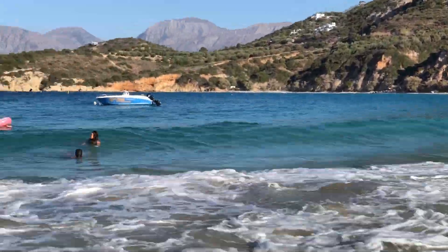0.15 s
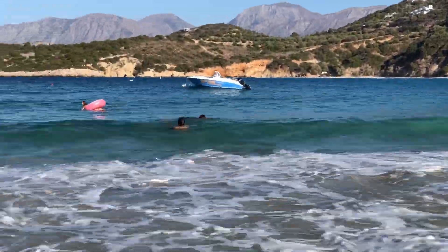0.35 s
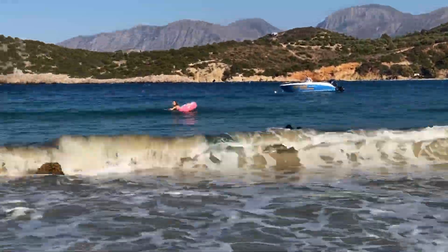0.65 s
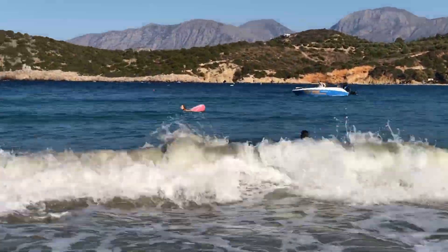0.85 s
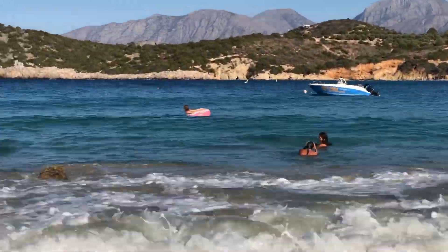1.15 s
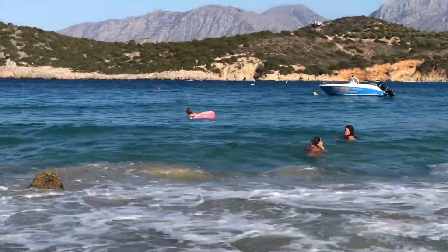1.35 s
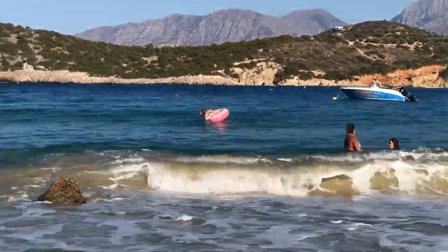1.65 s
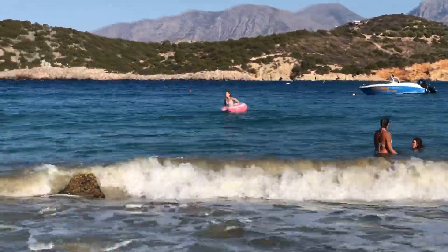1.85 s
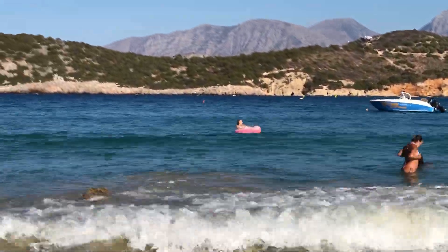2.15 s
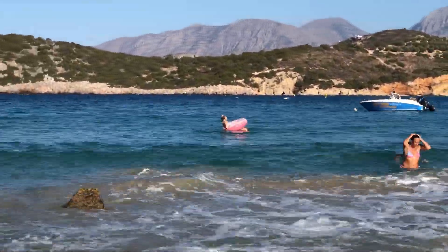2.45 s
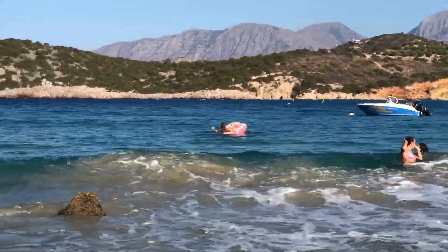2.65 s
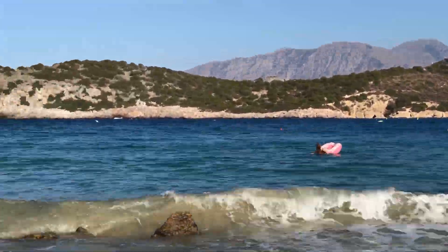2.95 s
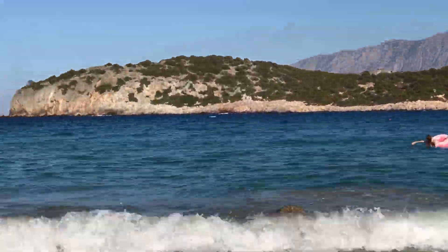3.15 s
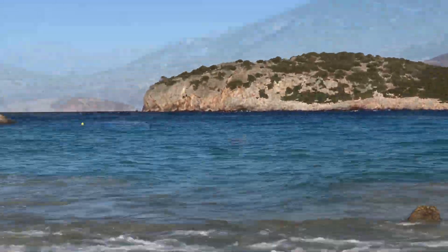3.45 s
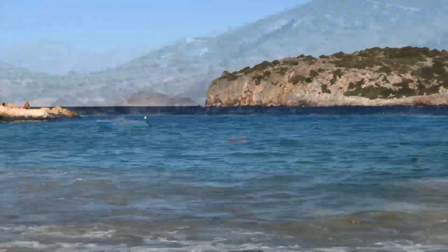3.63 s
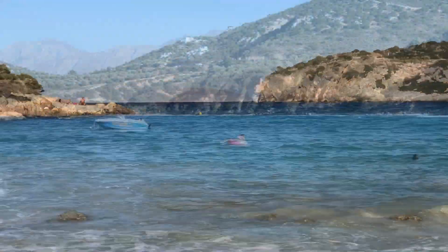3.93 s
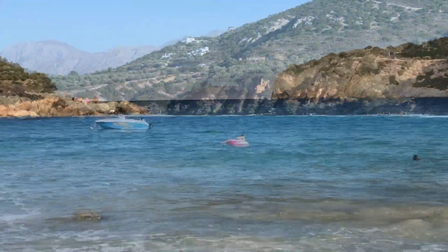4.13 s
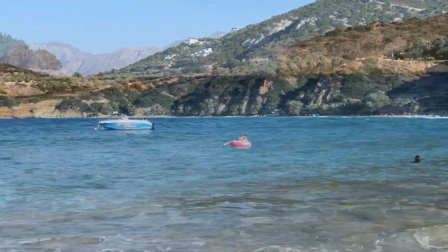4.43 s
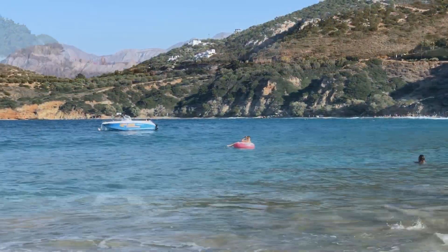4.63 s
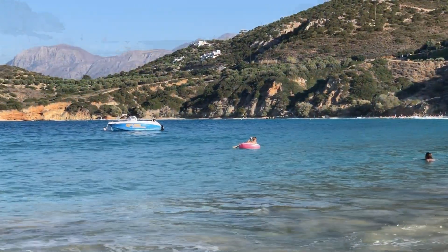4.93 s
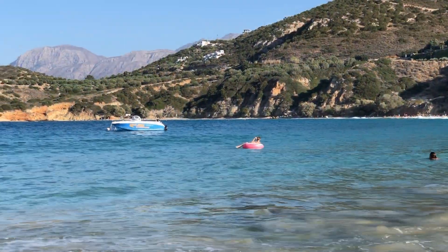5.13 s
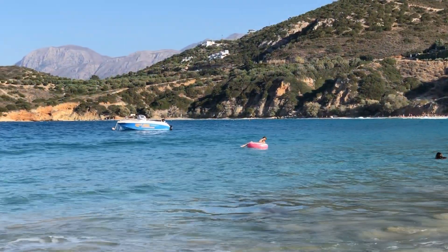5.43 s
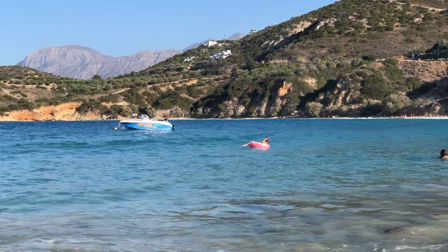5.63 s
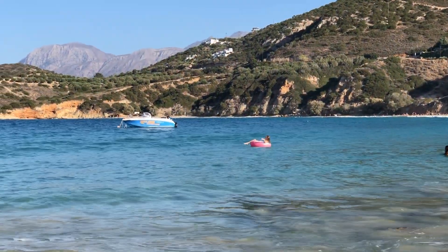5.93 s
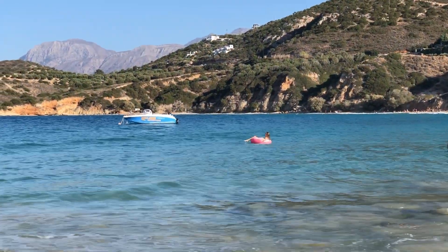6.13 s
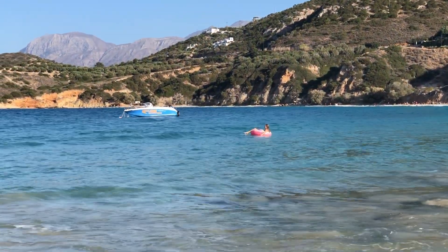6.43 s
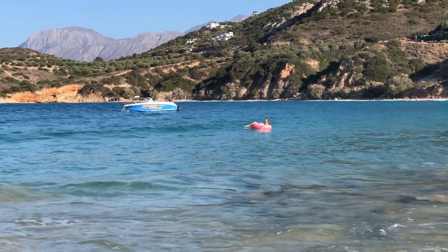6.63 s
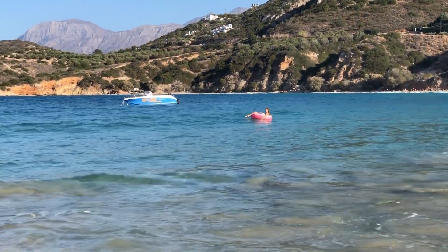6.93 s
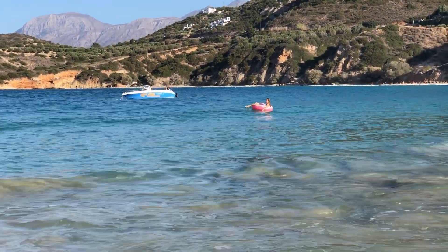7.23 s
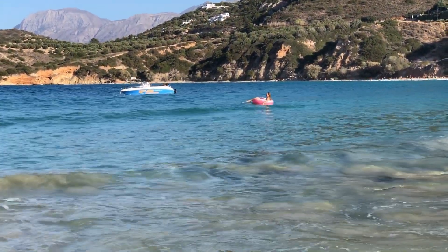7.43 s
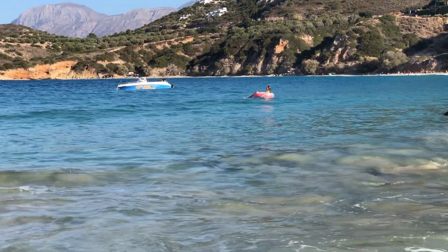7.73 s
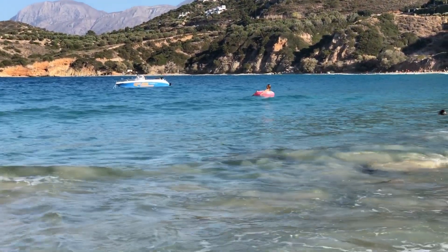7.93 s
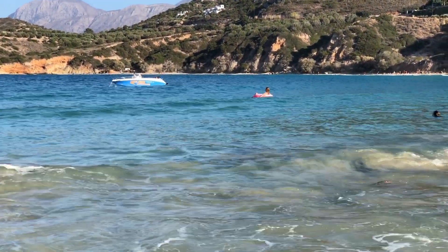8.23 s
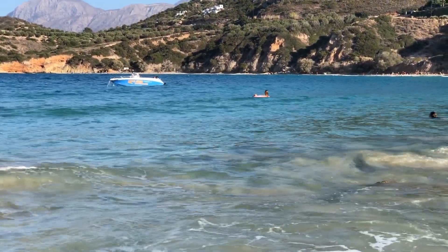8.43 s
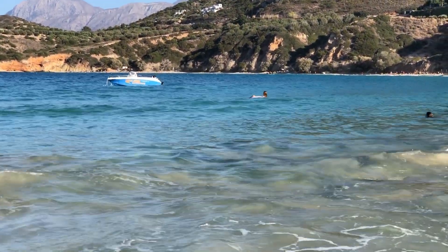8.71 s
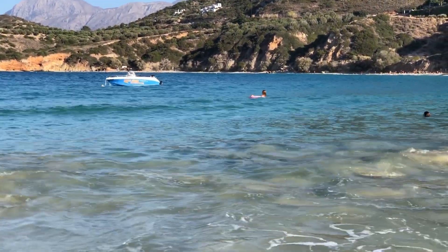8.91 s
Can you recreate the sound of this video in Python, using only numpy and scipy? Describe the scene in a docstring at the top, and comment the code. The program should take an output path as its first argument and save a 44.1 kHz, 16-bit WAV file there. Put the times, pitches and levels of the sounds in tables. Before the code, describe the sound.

Bright, hissing waves plunge close by on a sandy beach, then a deeper, duller swell builds and drains under thumping wind on the microphone.

```python
"""Surf from two spots on a sandy beach

Bright, thin breakers plunge close by in quick succession, with a few thin squeaks before the largest.
They overlap with, then give way to, a deeper, duller swell that builds and drains while wind thumps the microphone.
Water is noise and bubble clicks in moving bands, with an inverted echo off the sand; wind is lumpy low noise;
thumps are short dying swings and squeaks are gliding sines. One microphone hears it all."""
import sys
import numpy as np
from scipy import signal
from scipy.fft import rfft, irfft, next_fast_len
from scipy.io import wavfile

SR = 44100
rng = np.random.default_rng(int(sys.argv[2]) if len(sys.argv) > 2 else 0)


def invert_db(level):
    """Linear amplitude ratio for a level in decibels (20 dB per decade), elementwise."""
    return 10 ** (np.asarray(level, dtype=float) / 20)


def wav_record(signal):
    """Record a signal, one row per channel, as 16-bit PCM in the file named by sys.argv[1]."""
    frames = np.transpose(np.atleast_2d(signal))
    bounded = np.clip(frames, -1, 1)
    # unit amplitude maps onto the largest positive 16-bit level
    quanta = np.round(bounded * 32767).astype(np.int16)
    wavfile.write(sys.argv[1], SR, quanta)


N = 399982   # samples, about 9.07 s


def rms_one(x):
    """Scales to rms 1."""
    return x / np.sqrt(np.mean(x ** 2) + 1e-20)


def in_time(rows):
    """Columns of a table at every sample, and a gate that is open while the table lasts."""
    s, *columns = np.transpose(rows)
    t = np.arange(N) / SR
    inside_s = np.minimum(t - s[0], s[-1] - t)
    gate = np.clip(inside_s / .004 + 1, 0, 1)   # 4 ms ramps just outside the table
    return gate, [np.interp(t, s, column) for column in columns]


def at_hz(points, hz):
    """Reads a (Hz, value) table on a log frequency axis."""
    point_hz, values = np.array(points).T
    return np.interp(np.log(hz), np.log(point_hz), values)


def drift(corner_hz):
    """Slow random wander of rms 1: noise through two equal one-pole low-passes."""
    every = 40   # samples between computed points
    pole = np.exp(-2 * np.pi * corner_hz * every / SR)
    noise = rng.standard_normal(N // every + 2002)
    slow = signal.lfilter([1], [1, -2 * pole, pole * pole], noise)[2000:]   # skip the filter's start
    return np.interp(np.arange(N) / every, np.arange(len(slow)), rms_one(slow))


def coloured(x, colour):
    """Filters x by a (Hz, dB) colour table."""
    size = next_fast_len(N)
    hz = np.maximum(np.arange(size // 2 + 1) * SR / size, 1)
    return irfft(rfft(x, size) * invert_db(at_hz(colour, hz)), size)[:N]


def bursting(per_s, spread_db):
    """Countless bubbles bursting: dense random clicks of uneven size."""
    sizes = invert_db(spread_db * np.minimum(rng.exponential(1, N), 4)) * rng.standard_normal(N)
    return rms_one(sizes * (rng.random(N) < per_s / SR))


def surf(levels, usual_db, centres_hz, colour, grain, surge_db, patchy_db):
    """Churning water in half-octave bands; boom, splash and fizz set the balance, spray flickers in the treble."""
    hiss = np.sqrt(1 - grain) * rng.standard_normal(N)
    bubbles = np.sqrt(grain) * bursting(per_s=12000, spread_db=2.0)
    water = coloured(hiss + bubbles, colour)

    # the splash region sets the overall level
    splash_filter = signal.butter(4, [1500, 5000], "band", fs=SR, output="sos")
    water = water * invert_db(usual_db[-2]) / np.std(signal.sosfilt(splash_filter, water))

    size = next_fast_len(N)
    lowest_hz = 60
    octave = np.log2(np.maximum(np.arange(size // 2 + 1) * SR / size, 1) / lowest_hz)
    spectrum, out = rfft(water, size), 0
    spray = drift(12.0) + .8 * drift(35.0)
    for centre in np.arange(0, 8.6, .5):   # octaves above the lowest band
        share = np.cos(np.pi * np.clip(octave - centre, -.5, .5)) ** 2   # neighbours add up to one
        hz = lowest_hz * 2 ** centre
        # how far each level leads this band
        lead = [np.interp(np.log(hz), np.log(centres_hz), row) for row in np.eye(len(levels))]
        move_db = sum(w * (level - usual) for w, level, usual in zip(lead, levels, usual_db))
        spray_share = lead[-1] + 0.68 * lead[-2] + 0.58 * lead[-3]   # fizz, splash, boom
        flicker_db = surge_db * spray_share * spray + patchy_db * drift(8.6)   # each band has its own patches
        out = out + invert_db(move_db + flicker_db) * irfft(spectrum * share, size)[:N]
    return out


def with_echo(water, echo, dull_hz):
    """The ground throws back a duller, inverted copy, its delay set by the table."""
    _, (notch_hz, strength) = in_time(echo)
    dull = signal.lfilter(*signal.butter(2, dull_hz, fs=SR), water)
    delayed = np.interp(np.arange(N) - SR / notch_hz, np.arange(N), dull)
    return water - np.clip(strength, 0, .9) * delayed


def wind():
    """Eddies at the microphone rumble in lumps: low noise with a drifting strength."""
    # wind level over time: time_s, level_db
    wind_levels = [(3.13, -44), (3.85, -45.5), (4.35, -39), (4.65, -44), (5.45, -39), (6.1, -49),
                   (6.45, -52), (6.95, -39.5), (7.45, -46), (7.9, -49), (8.25, -54), (8.45, -45),
                   (8.75, -38), (9.07, -38)]
    # rumble spectrum: frequency_hz, relative_density_db
    wind_colour = [(15, -45), (28, -17), (55, -3), (100, -4.5), (160, -12), (300, -47)]
    gate, (wind_db,) = in_time(wind_levels)
    eddies = rng.standard_normal(N) * invert_db(3.7 * drift(4.5))
    return gate * invert_db(wind_db) * rms_one(coloured(eddies, wind_colour))


def dying_swing(t, hz, fall_cycles):
    """A few swings, counted in cycles, that swell, sag a little in pitch and die; peak 1."""
    cycles = np.maximum(t, 0) * hz
    turns = .85 * cycles + .5 * (1 - np.exp(-cycles / 2))   # pitch sags from 1.1 to .85 times hz
    strength = cycles ** 2 * np.exp(-(cycles / fall_cycles) ** 1.6)
    wave = np.sin(2 * np.pi * turns) * strength
    return wave / np.max(np.abs(wave))


def thumps():
    """A quick knock, then a slower push that follows and lasts longer."""
    # low thumps, probably slaps of water and gusts on the microphone:
    # start_s, nominal_pitch_hz, knock_peak_db, push_peak_db, push_lag_s
    blows = [(.136, 620, -24, -54, .002), (.254, 450, -26, -55, .002), (.686, 540, -24, -56, .002),
             (.8, 430, -24, -56, .002), (1.76, 370, -30, -58, .002), (4.198, 210, -38, -28, .004),
             (4.311, 250, -19, -26, .002), (4.434, 270, -27, -20, .002), (4.909, 580, -22, -36, .002),
             (5.048, 290, -25, -30, .012), (5.137, 230, -21, -34, .004), (7.507, 430, -17, -23, .004),
             (8.411, 330, -30, -35, .014), (8.552, 200, -31, -38, .004), (8.642, 265, -19, -24, .014),
             (8.787, 300, -23, -36, .008), (8.913, 260, -29, -34, .003)]
    out = np.zeros(N)
    t = np.arange(int(.15 * SR)) / SR
    for start_s, pitch_hz, knock_db, push_db, lag_s in blows:
        knock = invert_db(knock_db) * dying_swing(t, pitch_hz, 2.0)
        push = invert_db(push_db) * dying_swing(t - lag_s, .37 * pitch_hz, 1.3)
        at = round(start_s * SR)
        out[at:at + len(t)] += (knock + push)[:N - at]
    return out


def squeaks():
    """Thin gliding whistles that flutter in strength, with a weaker octave where it fits under the top."""
    # one glide a row: start_s, length_s, from_hz, to_hz, loudest_rms_db (first partial, before flutter)
    glides = [(.487, .05, 4000, 8200, -33), (.542, .018, 13800, 10100, -33),
              (.565, .012, 12700, 13400, -39), (.566, .024, 6400, 7100, -46),
              (.596, .012, 11900, 13300, -32), (.603, .007, 14700, 15400, -40)]
    settles = 2.6   # how strongly the glide slows
    out, flutter = np.zeros(N), invert_db(4.0 * drift(110.0))
    for start_s, length_s, from_hz, to_hz, loudest_db in glides:
        gate, (done,) = in_time([(start_s, 0), (start_s + length_s, 1)])
        hz = from_hz + (to_hz - from_hz) * (1 - np.exp(-settles * done)) / (1 - np.exp(-settles))
        level_db = loudest_db + np.interp(done, [0, .2, 1], [-9, 0, -9])   # loudest a fifth of the way in
        phase = 2 * np.pi * np.cumsum(hz) / SR
        octave_share = invert_db(-4) * np.clip(hz / 5000 - .6, 0, 1) * (2 * hz < 15750)
        tone = np.sin(phase) + octave_share * np.sin(2 * phase)
        out += gate * flutter * np.sqrt(2) * invert_db(level_db) * tone
    return out


def swell():
    """A broad, deep wave rolls in and drains; its boom follows most of the splash's swing."""
    # wave over time: time_s, splash_db, treble_db, rumble_db
    wave_levels = [(3.13, -38, -66, -34.5), (3.8, -40.5, -66, -36.5), (4.05, -40.5, -62, -39.5),
                   (4.4, -35.5, -65, -40), (4.8, -34.5, -52, -41), (5.05, -32, -49, -37.5),
                   (5.25, -34, -47, -38), (5.7, -32.5, -45.5, -38), (6.0, -31, -44.5, -36.5),
                   (6.5, -30.5, -42, -35.5), (6.8, -29, -41, -34), (7.2, -28, -40, -29),
                   (7.42, -29, -42, -33.5), (7.53, -29, -43, -28.5), (7.6, -32, -45.5, -34.5),
                   (7.75, -33.5, -44.5, -36.5), (7.92, -37, -49.5, -36.5), (8.06, -37, -50, -35.5),
                   (8.3, -42.5, -52, -43.5), (8.6, -43, -54.5, -40), (9.07, -46, -55.5, -44)]
    # water spectrum: frequency_hz, relative_density_db
    swell_colour = [(60, -23), (120, -7), (250, -3), (400, -3), (800, -4), (1950, -10.5), (4900, -15.5),
                    (7000, -19.5), (9000, -23), (15700, -41)]
    # usual levels of rumble, boom, splash, fizz [dB]
    swell_usual_db = [-38, -29.5, -33.5, -45]
    # where rumble, boom, splash, fizz lead [Hz]
    swell_centres_hz = [220, 600, 2700, 11000]
    # echo off the sand: time_s, notch_spacing_hz, strength (0-1)
    swell_echo = [(3.13, 490, 0.25), (5.0, 463, 0.26), (6.3, 490, 0.19), (7.0, 540, 0), (7.7, 573, 0),
                  (9.07, 500, 0)]
    gate, (splash_db, treble_db, rumble_db) = in_time(wave_levels)
    boom_db = swell_usual_db[1] + 0.89 * (splash_db - swell_usual_db[2])
    water = surf([rumble_db, boom_db, splash_db, treble_db], swell_usual_db, swell_centres_hz,
                 swell_colour, grain=0.28, surge_db=0.42, patchy_db=0.52)
    return gate * with_echo(water, swell_echo, dull_hz=1470)


def plunge_levels():
    """Each plunge climbs, holds and fades, band by band, over the hissing foam; powers add."""
    # crests plunging close by: start_s, rise_s, then peaks boom_db, splash_db, fizz_db
    plunges = [(0.04, 0.074, -34, -34, -47), (0.61, 0.077, -26.5, -26, -36), (0.72, 0.023, -29.5, -44, -48),
               (1.725, 0.022, -34.5, -30, -44), (1.84, 0.032, -33, -34, -46),
               (2.95, 0.069, -32.5, -28.5, -38), (3.05, 0.037, -32, -43, -44)]
    # time that boom, splash, fizz stay at the peak [s]
    plunge_hold_s = [0.05, 0.027, .04]
    # how fast boom, splash, fizz then die away [dB/s]
    plunge_fade_db_per_s = [33, 18.5, 42]
    # foam hissing on the sand between the plunges: time_s, fizz_db
    foam = [(0, -34.5), (.3, -36), (.42, -39), (.5, -40.5), (.57, -47), (.63, -42), (.9, -39), (1.5, -36),
            (1.7, -40), (2.0, -39.5), (2.35, -38), (2.93, -39.5), (3.45, -37), (3.63, -40), (3.8, -38.5),
            (3.93, -40.5), (4.08, -40), (4.55, -38.5), (4.75, -43), (5.11, -40)]
    # boom, splash, fizz of the foam relative to its fizz [dB]
    foam_bands_db = [-4.5, 4.5, 0]
    gate, (foam_db,) = in_time(foam)
    t, levels = np.arange(N) / SR, []
    bands = zip(plunge_hold_s, plunge_fade_db_per_s, foam_bands_db)
    for band, (hold_s, fade_db_per_s, above_db) in enumerate(bands):
        power = invert_db(foam_db + above_db) ** 2
        for start_s, rise_s, *peak_db in plunges:
            climb_db = 14 * np.minimum((t - start_s) / rise_s - 1, 0)   # 14 dB during the rise
            fade_db = fade_db_per_s * np.maximum(t - start_s - rise_s - hold_s, 0)
            power = power + invert_db(peak_db[band] + climb_db - fade_db) ** 2
        levels.append(10 * np.log10(power))
    return gate, levels


def breakers():
    """Close plunging waves and their foam, notched by their echo."""
    # water spectrum: frequency_hz, relative_density_db
    breaker_colour = [(53, -75), (90, -63), (180, -22.5), (320, -6.5), (880, -1), (2000, -2.5),
                      (3600, -3.5), (6200, -7.5), (11000, -12.5), (15700, -15)]
    # usual levels of boom, splash, fizz [dB]
    breaker_usual_db = [-36.5, -32.5, -38]
    # where boom, splash, fizz lead [Hz]
    breaker_centres_hz = [500, 2920, 11500]
    # echo off the sand: time_s, notch_spacing_hz, strength (0-1)
    breaker_echo = [(0, 2550, 0.22), (.9, 2320, 0.22), (1.35, 2590, 0.24), (2.0, 2550, 0.26),
                    (2.8, 2500, 0.26), (3.1, 2050, 0.17), (3.5, 2000, 0.16), (4.0, 1760, 0.13),
                    (5.11, 1780, 0)]
    gate, levels = plunge_levels()
    water = surf(levels, breaker_usual_db, breaker_centres_hz, breaker_colour,
                 grain=0.3, surge_db=0.4, patchy_db=0.8)
    return gate * with_echo(water, breaker_echo, dull_hz=6600)


def scene():
    """One microphone feeds both channels."""
    mono = breakers() + swell() + wind() + thumps() + squeaks()
    return np.tile(mono, (2, 1))


def low_pass(x):
    """Removes everything above the highest recorded frequency."""
    return signal.sosfilt(signal.butter(12, 15740, fs=SR, output="sos"), x)


def record(dry):
    """The microphone loses the deepest bass."""
    bass_cut = signal.butter(2, 39.8, "high", fs=SR, output="sos")   # corner in Hz
    thin = signal.sosfilt(bass_cut, dry)
    return low_pass(thin)


dry = scene()
out = record(dry)
wav_record(out)
```